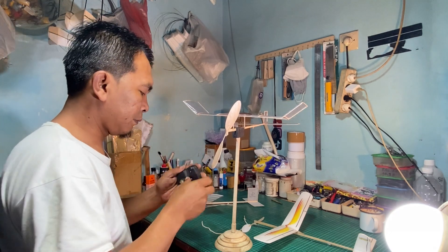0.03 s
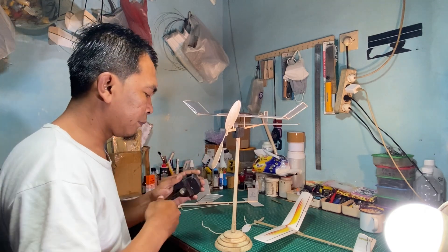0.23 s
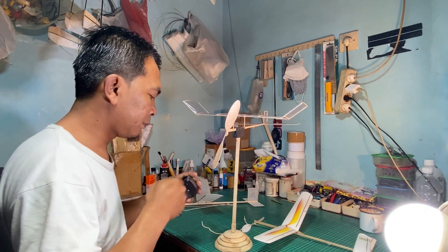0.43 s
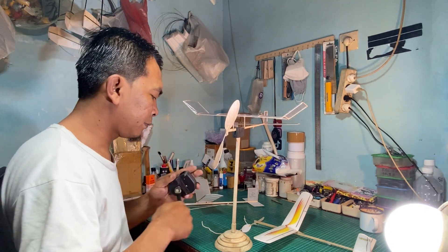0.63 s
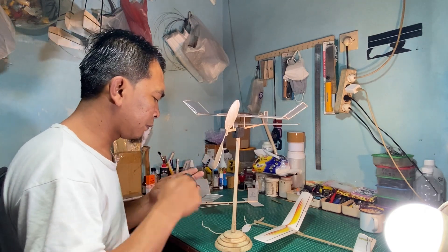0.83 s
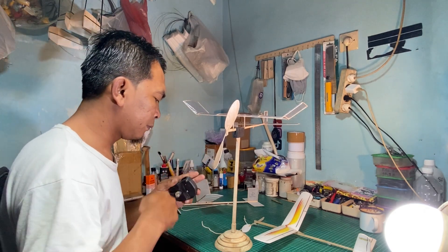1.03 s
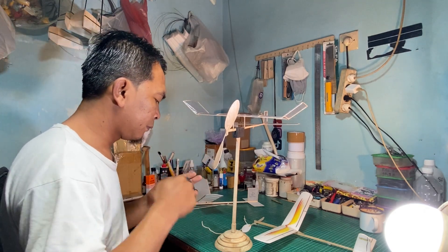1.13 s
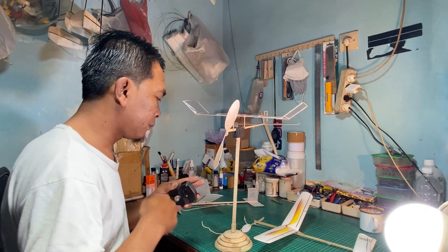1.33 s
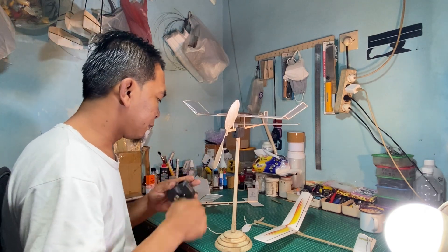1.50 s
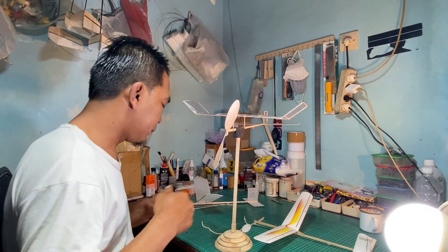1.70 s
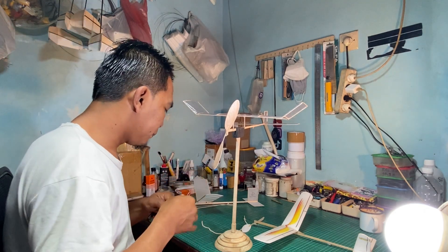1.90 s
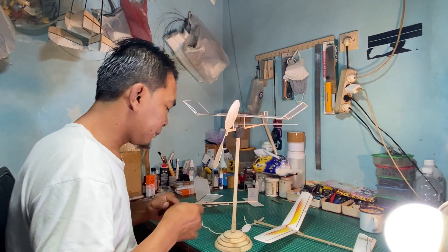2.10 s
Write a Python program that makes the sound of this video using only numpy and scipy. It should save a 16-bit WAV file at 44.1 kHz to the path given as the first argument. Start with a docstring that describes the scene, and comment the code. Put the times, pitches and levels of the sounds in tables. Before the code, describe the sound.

A small ratchet reel is pulled out in one fast, buzzing run of plastic clicks.

```python
"""In the faint air of a small, hard-walled workshop, a hand-held ratchet reel clacks as it is gripped.
Each impact rings the plastic case, and the room reverberates. From 0.2 s the reel is pulled out in one
long stroke: the pawl chatters over the teeth, speeding up to some 270 a second, parts snag with harder
clacks, and the tightening spring sings. The wheel stops at 1.64 s. Near 2 s come a few soft clicks
and a brush of fingers on the case."""
import sys
import numpy as np
from scipy import signal
from scipy.fft import rfft, irfft, next_fast_len
from scipy.io import wavfile

SR = 44100
rng = np.random.default_rng(int(sys.argv[2]) if len(sys.argv) > 2 else 0)


def wav_record(signal):
    """Record a signal, one row per channel, as 16-bit PCM in the file named by sys.argv[1]."""
    frames = np.transpose(np.atleast_2d(signal))
    bounded = np.clip(frames, -1, 1)
    # unit amplitude maps onto the largest positive 16-bit level
    quanta = np.round(bounded * 32767).astype(np.int16)
    wavfile.write(sys.argv[1], SR, quanta)


N = 94815
LEAD = 4410  # samples ahead of t = 0, so that an earlier impact can ring on


def amp(db):
    """Amplitude ratio of a level in decibels."""
    return 10 ** (np.asarray(db) / 20)


def at_frequency(points, hz):
    """Interpolation of a table on a logarithmic frequency axis."""
    f, value = np.transpose(points)
    return np.interp(np.log(hz + 1), np.log(f), value)


def envelope(points):
    """Linear interpolation of a table in time, sample by sample."""
    return np.interp(np.arange(-LEAD, N) / SR, *np.transpose(points))


def unit(x):
    """Normalisation to unit energy."""
    return x / np.sqrt((x ** 2).sum(-1, keepdims=True) + 1e-20)


def filtered(x, gain):
    """Linear filtering: the spectrum is multiplied by a frequency response."""
    size = next_fast_len(2 * x.shape[-1])
    return irfft(rfft(x, size) * gain(np.fft.rfftfreq(size, 1 / SR)), size)[..., :x.shape[-1]]


def room_air(rms_db=-77.5, correlation=0.27):
    """Ambient noise: faint rumble and hiss, partly coherent between left and right."""
    # noise density of the room: f/Hz, relative level/dB
    spectrum = [(20, -8.5), (36, -6), (49, 10), (62, 15), (90, 4), (160, 0.5), (300, -2.5), (600, -9),
                (2000, -19.5), (6000, -12.5), (13500, -21), (16000, -28.5)]
    noise = rng.standard_normal((3, N))
    pair = np.sqrt(correlation) * noise[2] + np.sqrt(1 - correlation) * noise[:2]
    return amp(rms_db) * np.sqrt(N) * unit(filtered(pair, lambda hz: amp(at_frequency(spectrum, hz))))


def case_clicks(crossover_hz=(2200, 3700, 9000)):
    """Minimum-phase impulse response of the case in four bands: low, middle, treble and top."""
    # spectrum of one click: f/Hz, relative level/dB
    spectrum = [(100, -59.5), (350, -31.5), (550, -23.5), (780, -16), (1080, -4.5), (1500, 1.5),
                (2050, 2.5), (2750, 2.5), (3600, -0.5), (4900, -5.5), (6900, -4), (8400, -5.5), (9500, -6),
                (11000, -14), (14000, -17.5), (14600, -34.5), (15100, -48)]
    hz = abs(np.fft.fftfreq(4096, 1 / SR))
    a, b, c = (1 / (1 + (hz / edge) ** 14) for edge in crossover_hz)
    bands = np.array([a, (1 - a) * b, (1 - b) * c, 1 - c])
    gains = bands * amp(at_frequency(spectrum, hz)) + 1e-4
    response = np.exp(np.conj(signal.hilbert(np.log(gains))))
    return unit(np.fft.ifft(response).real)


def impacts(times, strengths, knock_hz=1245, rattle_db=9.5, rattle_t60_s=0.02, variants=24):
    """Impulsive excitation in four bands: the plastic cracks and rattles, case and pawl ring briefly."""
    # the pawl's ping shifts with the grip: t/s, f/Hz, tonal share of the two lower bands/1
    ping = [(.25, 2730, 0.5), (.42, 3350, 0.4), (.456, 2580, 0.4), (0.463, 3360, 0.4), (0.511, 3109, 0.46),
            (.55, 2450, 0.7), (0.583, 3195, .35), (.66, 2540, .5), (.78, 2820, 0.63), (.90, 2800, 0.54),
            (1.01, 2820, 0.59), (1.08, 2720, 0.54), (1.2, 2794, 0.81), (1.29, 2680, 0.4),
            (1.35, 2840, 0.36), (1.42, 2750, 0), (1.50, 2720, 0.37), (1.55, 2541, 0.53), (1.62, 2760, 0),
            (1.98, 2920, 0.21)]
    grip_s, grip_hz, grip_share = np.transpose(ping)
    clicks, t = case_clicks(), np.arange(1024) / SR
    bursts = unit(rng.standard_normal((variants, len(t))) * amp(-60 * t / rattle_t60_s))
    rattles = unit(signal.fftconvolve(bursts[:, None], clicks[None], axes=2))
    cracks = np.pad(clicks, ((0, 0), (0, len(t) - 1)))
    out = np.zeros(N + LEAD + 8192)
    for s, strength, (pick, detune, shift, phase) in zip(times, strengths, rng.random((len(times), 4))):
        k = int(pick * variants)
        loose = amp(rattle_db) / (1 + (strength[2] / amp(-4)) ** 2)  # strong treble: less rattle
        blow = unit((-1) ** k * cracks + loose * rattles[k])
        tonal = np.interp(s, grip_s, grip_share)
        case_hz = knock_hz * (1 + 0.14 * (2 * shift - 1))
        pawl_hz = np.interp(s, grip_s, grip_hz) * (1 + 0.058 * (2 * detune - 1))
        for band, (hz, rise_s) in enumerate([(case_hz, 0.00061), (pawl_hz, 0.00065)]):
            note = unit((t / rise_s) ** 2 * np.exp(-t / rise_s) * np.sin(2 * np.pi * (hz * t + phase)))
            blow[band] *= np.sqrt(1 - tonal)
            blow[band, :len(t)] += np.sqrt(tonal) * note
        start = int(np.clip(round(s * SR) + LEAD, 0, N + LEAD))
        out[start:start + blow.shape[1]] += strength @ unit(blow)
    return out[:N + LEAD]


def clacks(trim_db=-4, duration_s=.01):
    """Isolated transients: parts collide as the mechanism is gripped, snags and stops."""
    # single blows: t/s, then relative level/dB in the low, middle, treble and top bands
    blows = [(-.025, -43.5, -46, -43, -50), (.001, -53.5, -50.5, -62, -65), (.121, -61, -62.5, -71, -74),
             (0.2077, -57, -57, -51, -56.5), (.217, -33.5, -45, -42.5, -59), (.238, -36, -47, -52, -68.5),
             (0.2458, -51, -43, -37.5, -46), (0.2585, -39, -42, -37, -59), (.267, -46, -44, -47, -65),
             (0.37, -45, -48, -43.5, -50), (0.394, -49, -47, -56, -68), (.423, -49, -33, -34, -45),
             (.456, -32, -32.5, -49, -60), (0.465, -53, -37.5, -44, -47), (0.4728, -41, -49, -41.5, -43),
             (0.505, -49, -34, -47, -57), (.572, -32, -47, -37, -49), (.583, -44, -33.5, -44, -41),
             (.642, -34, -35.5, -51, -59), (0.6553, -57, -31, -35, -47), (0.6788, -36.5, -31.5, -33.5, -53),
             (0.7039, -38.5, -42, -30, -33), (.775, -39.5, -29, -32.5, -39), (.7815, -50, -35, -31, -41),
             (0.821, -46, -37, -36.5, -51.5), (.890, -44, -31.5, -33, -34), (0.8974, -35, -33, -37, -45.5),
             (.911, -43, -40, -40, -41), (.918, -46.5, -36, -31.5, -37.5), (0.968, -52, -25.5, -34, -48),
             (0.9859, -41, -29, -34.5, -31.5), (1.0045, -35.5, -29.5, -33, -37.5),
             (1.012, -45.5, -33.5, -33.5, -32), (1.016, -35.5, -27, -35, -43.5),
             (1.037, -38.5, -39.5, -31, -39), (1.170, -34.5, -42.5, -33, -37),
             (1.202, -38.5, -31.5, -31.5, -35), (1.210, -43.5, -23.5, -38.5, -47.5),
             (1.238, -33, -30, -41.5, -46), (1.261, -40, -29, -35, -47.5),
             (1.283, -37.5, -33.5, -32.5, -34), (1.2907, -35.5, -35.5, -31.5, -39.5),
             (1.302, -30, -41, -39, -38.5), (1.311, -28.5, -40, -34, -34.5),
             (1.327, -36.5, -26.5, -35, -38.5), (1.349, -42, -28, -32, -40),
             (1.358, -39.5, -28, -39.5, -48.5), (1.369, -33, -33, -34, -43),
             (1.453, -35, -30.5, -45, -54.5), (1.515, -48, -26, -36.5, -44.5),
             (1.5203, -31, -24.5, -25.5, -35), (1.527, -34, -32.5, -35, -37),
             (1.532, -30, -36, -32.5, -42.5), (1.537, -33.5, -32.5, -32.5, -40.5),
             (1.5451, -28.5, -21, -34, -37.5), (1.595, -38.5, -37.5, -44.5, -59.5),
             (1.607, -38, -39, -46.5, -63), (1.637, -34.5, -43, -51, -61.5),
             (1.642, -35.5, -40.5, -42.5, -48.5), (1.9797, -56.5, -54, -79, -94),
             (1.985, -60.5, -58, -76, -92), (2.019, -65, -67.5, -84, -87)]
    rows = np.array(blows)
    strengths = amp(rows[:, 1:] + trim_db) * np.sqrt(duration_s * SR)  # energy = power times duration
    return impacts(rows[:, 0], strengths)


def ringing(x, ring_db=-7, spring_hz=2902, spring_t60_s=.13):
    """Modal resonance: the impacts drive damped modes of case and spring, which add to their sound."""
    # modes of case and spring: f/Hz, relative level/dB, T60/s
    modes = [(1098.2, -20.5, 0.2), (1266, -27.5, 0.081), (1465, -27.5, 0.22), (1630, -34.5, .16),
             (1919, -21.5, 0.16), (2190, -18, 0.12), (2594, -28.5, .1), (2640, -29, 0.17),
             (2784, -30.5, 0.19), (2903, -30, 0.16), (3230, -29, 0.11), (4110, -28.5, 0.11),
             (4650, -28, .14), (6870, -20, 0.011)]
    # the spring sings as it tightens: t/s, relative drive level/dB
    spring_drive = [(.3, -49), (.7, -39), (1.1, -29.5), (1.18, -13.5), (1.36, -16), (1.43, -32)]
    t = np.arange(SR // 4) / SR
    ring = sum(amp(db) * unit(np.cos(2 * np.pi * hz * t) * amp(-60 * t / t60)) for hz, db, t60 in modes)
    spring = unit(np.cos(2 * np.pi * spring_hz * t) * amp(-60 * t / spring_t60_s))
    singing = signal.fftconvolve(x * amp(envelope(spring_drive)), spring)
    return x + amp(ring_db) * (signal.fftconvolve(x, ring) + singing)[:len(x)]


def direct_sound(x):
    """Directivity: the reel's sound arrives left and right with differing phase and level."""
    # right behind left: f/Hz, phase lag/rad
    lag = [(300, .1), (2000, .6), (3000, -.7), (5000, -.7), (6600, -.6), (8200, 3), (9700, 4.3),
           (11400, 6.15), (13000, 6.45), (15000, 8.5)]
    # right over left with the reel fully turned: f/Hz, level/dB
    balance = [(500, -1.5), (1800, -0.5), (2800, -1), (4000, 9), (5500, 3.5), (7800, 14.5), (9300, 11.5),
               (10300, -9), (12000, 0), (15000, 1.5)]
    # turn of the reel to the right: t/s, share/1
    facing = [(.3, 0.64), (.62, 0.84), (.80, 0.56), (1.3, 0.92), (1.45, 0.65), (1.62, 0.67)]
    side = np.array([[-.5], [.5]])
    ahead = filtered(np.array([x, x]), lambda hz: np.exp(-1j * side * at_frequency(lag, hz)))
    turned = filtered(ahead, lambda hz: amp(side * at_frequency(balance, hz)))
    turn = envelope(facing)
    return (1 - turn) * ahead + turn * turned


def reverberation(x, onset_s=0.0027, early_db=4.5, early_fade_s=0.0055):
    """Diffuse field: the workshop's dense reflections decay exponentially, faster in the treble."""
    # reverberation time: f/Hz, T60/s
    decay = [(300, .5), (700, 0.48), (1200, 0.51), (2700, 0.4766), (5000, 0.43), (8000, 0.36),
             (14000, .335)]
    # reflections over direct sound: f/Hz, level/dB
    colour = [(300, 2), (1200, -2.5), (3000, 1), (6500, 1.5), (9000, -5.5), (13000, -7)]
    # reflections, right over left: f/Hz, level/dB
    balance = [(1000, 2.8), (3000, 0.47), (6000, 6.8), (10000, 0.03686)]
    hz, t, noise = signal.stft(rng.standard_normal((2, SR * 3 // 4)), SR, nperseg=256)
    t60 = at_frequency(decay, hz)[:, None]
    tail = signal.istft(noise * amp(-60 * t / t60) / np.sqrt(t60), SR, nperseg=256)[1]
    t = np.arange(tail.shape[1]) / SR
    build_up = 1 - np.exp(-(t / onset_s) ** 2)
    tail = unit(tail * build_up * amp(early_db * np.exp(-t / early_fade_s)))
    wet = signal.fftconvolve(x[None], tail, axes=1)[:, :len(x)]
    side = np.array([[-.5], [.5]])
    return filtered(wet, lambda hz: amp(at_frequency(colour, hz) + side * at_frequency(balance, hz)))


def pawl_chatter(start_s=.216, stop_s=1.64, jitter_s=.0003, rebound_s=.0014, rebound_db=-11.5):
    """Impact train with friction: the pawl drops off each tooth, bounces once and slides to the next."""
    # speed of the wheel: t/s, tooth rate/Hz
    speed = [(.216, 145), (.28, 146), (.34, 153), (.41, 212), (.47, 207), (.61, 261), (.70, 225),
             (.78, 282.96), (.83, 240), (.90, 317), (1.0, 277), (1.15, 255), (1.22, 260), (1.30, 306),
             (1.38, 297), (1.46, 294), (1.56, 256), (1.64, 231)]
    # chatter: t/s, then relative level/dB in the low, middle, treble and top bands
    loudness = [(.222, -48, -43, -47, -58), (.256, -39.5, -40.5, -46, -66), (.285, -49, -46, -50.5, -68),
                (.338, -57, -54, -60, -73.5), (.406, -43.5, -43, -49, -58), (.42, -42.5, -36.5, -47, -54.5),
                (.47, -45.5, -54, -48, -60), (.502, -44, -44, -45, -58.5), (.55, -39, -37, -42.5, -50),
                (.626, -45.5, -39.5, -40.5, -51.5), (.648, -44, -47, -45, -69),
                (0.655, -39.5, -34, -41, -46), (.745, -44.5, -32, -37.5, -54), (.784, -43, -33.5, -37, -43),
                (.834, -41, -36, -40.5, -49), (.898, -38.5, -30.5, -33.5, -41), (.94, -41, -37, -37.5, -45),
                (0.994, -37.5, -32, -31.5, -40.5), (1.03, -42.5, -35, -39.5, -46),
                (1.08, -37, -31, -34.5, -44.5), (1.145, -41.5, -34, -38.5, -50),
                (1.23, -38, -32, -34.5, -42), (1.299, -38, -34, -33.5, -40.5),
                (1.36, -38.5, -33.5, -37.5, -44), (1.40, -35.5, -35.5, -35, -42.5),
                (1.44, -36, -36.5, -42.5, -50), (1.495, -37.5, -35, -38.5, -50.5),
                (1.529, -31.5, -27.5, -35, -45), (1.57, -40, -34, -42.5, -53),
                (1.61, -39.5, -38, -41.5, -58), (1.64, -37, -46, -53, -64)]
    # sliding, greatest while the wheel is slow: t/s, share of power/1
    slide_share = [(.22, 0.64), (.40, 0.4), (.62, 0.19), (.9, 0.16), (1.3, 0.15), (1.64, .2)]
    trims_db, tooth_spread_db, band_spread_db = (0, -2, -0.5, 3), 3, 2.5
    t, count = np.arange(-LEAD, N) / SR, 600
    chance, hiss = rng.standard_normal((count, 11)), rng.standard_normal((4, len(t)))
    running = (t > start_s) & (t < stop_s)
    rate, sliding = envelope(speed), envelope(slide_share)
    teeth_passed = np.cumsum(rate * running) / SR
    at = np.minimum(np.searchsorted(teeth_passed, np.arange(count) + 1), len(t) - 1)
    times, *bands_db = np.transpose(loudness)
    level = running * np.array([amp(np.interp(t, times, db) + trim)
                                for db, trim in zip(bands_db, trims_db)])
    per_tooth = np.sqrt((1 - sliding[at]) * SR / rate[at]) * amp(tooth_spread_db * chance[:, 0])
    force = level[:, at].T * per_tooth[:, None]
    drops = t[at] + jitter_s * chance[:, 1]
    bounces = drops + rebound_s * np.exp(chance[:, 2] / 2)
    strengths = np.vstack([force * amp(band_spread_db * chance[:, 3:7]),
                           force * amp(rebound_db + band_spread_db * chance[:, 7:])])
    scrape = signal.fftconvolve(hiss * level * np.sqrt(sliding), case_clicks(), axes=1).sum(0)[:len(t)]
    return impacts(np.r_[drops, bounces], strengths) + scrape


def finger_rustle(centre_hz=11800, width_hz=2500):
    """Friction noise: skin brushes faintly on plastic once the wheel has stopped."""
    # fingers shifting on the case: t/s, level/dB
    brush = [(1.99, -110), (2.02, -80), (2.06, -87), (2.15, -89)]
    noise = rng.standard_normal(N + LEAD)
    hiss = filtered(noise, lambda hz: np.exp(-((hz - centre_hz) / width_hz) ** 2))
    return np.sqrt(len(hiss)) * unit(hiss) * amp(envelope(brush))


def scene(chatter_db=-5.0, clacks_db=-4.0):
    """Superposition of the reel's direct sound, its reverberation and the ambient noise."""
    reel = ringing(amp(chatter_db) * pawl_chatter() + amp(clacks_db) * clacks()) + finger_rustle()
    return (direct_sound(reel) + reverberation(reel))[:, LEAD:] + room_air()


def record(dry, cutoff_hz=15850):
    """Band limiting by a linear-phase low-pass filter."""
    low_pass = signal.firwin(511, cutoff_hz, window=("kaiser", 9), fs=SR)
    return signal.oaconvolve(dry, low_pass[None], "same")


dry = scene()
out = record(dry)
wav_record(out)
```